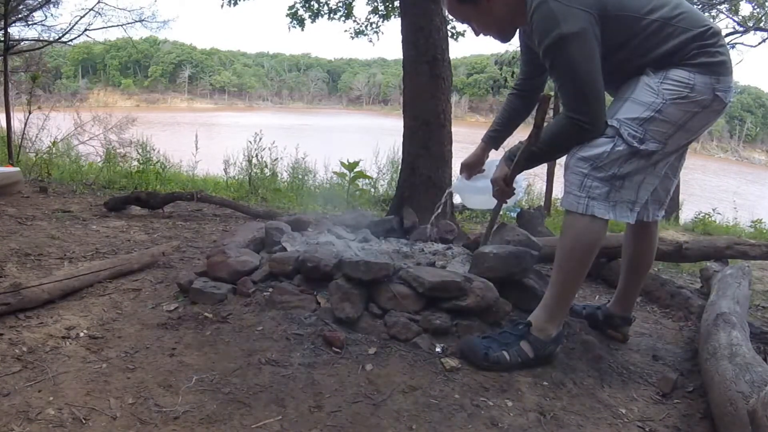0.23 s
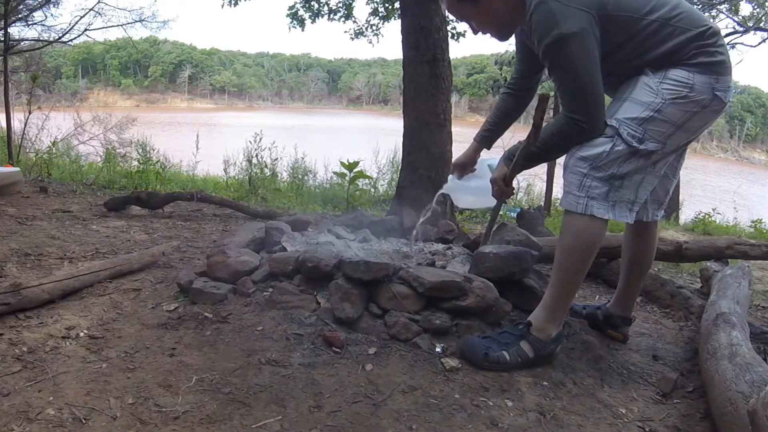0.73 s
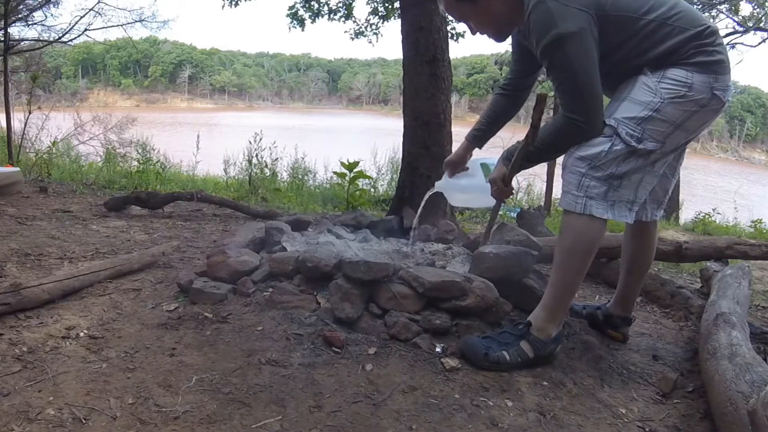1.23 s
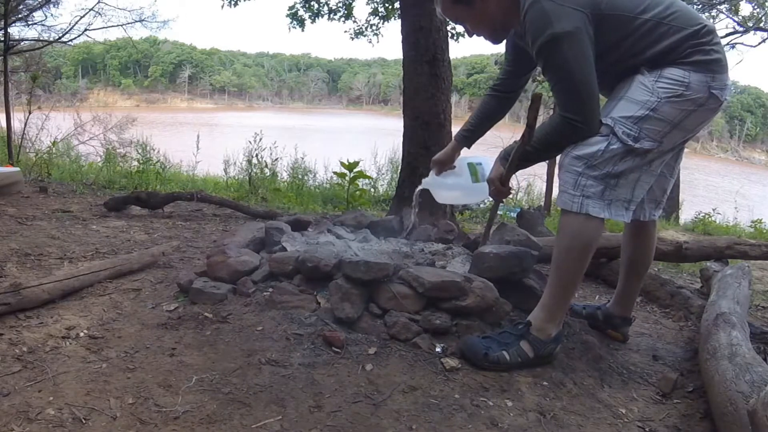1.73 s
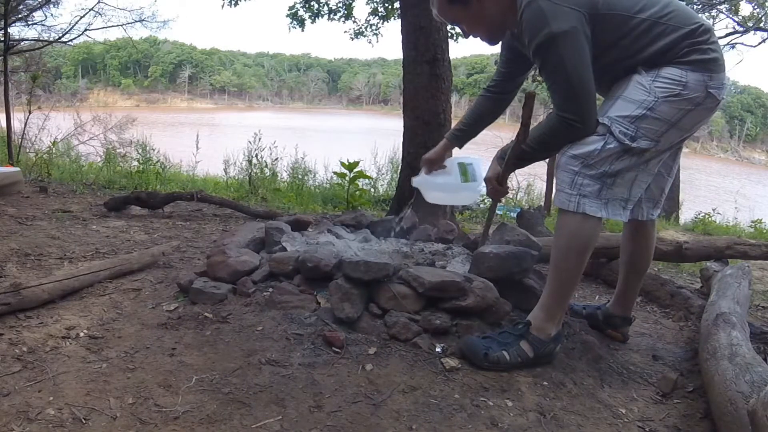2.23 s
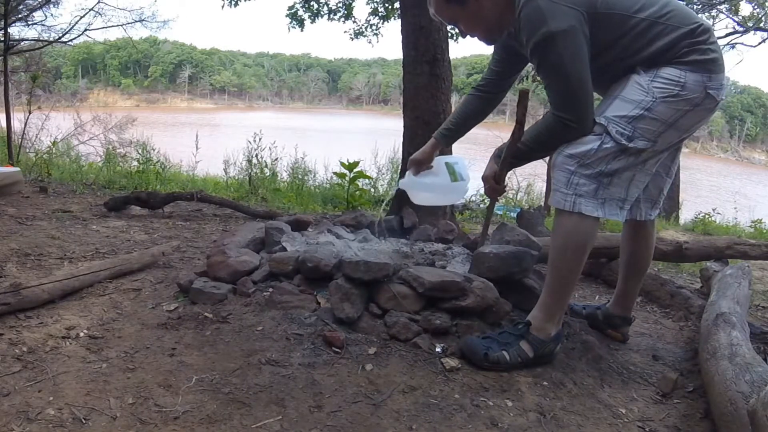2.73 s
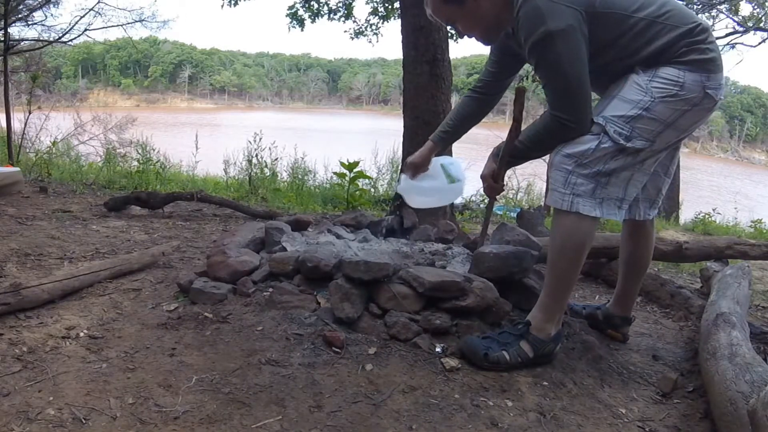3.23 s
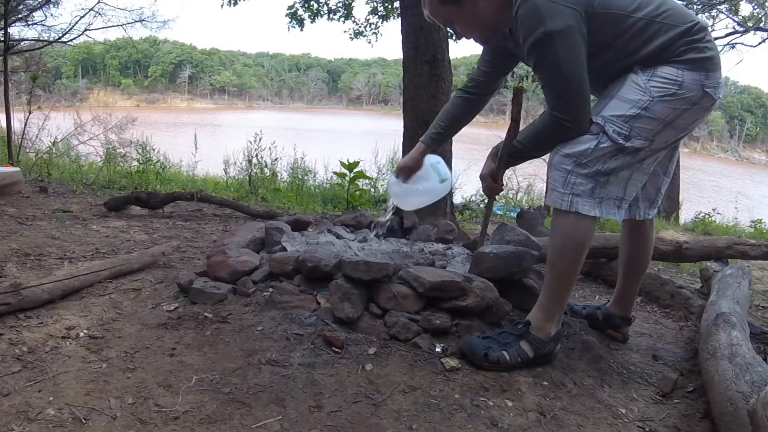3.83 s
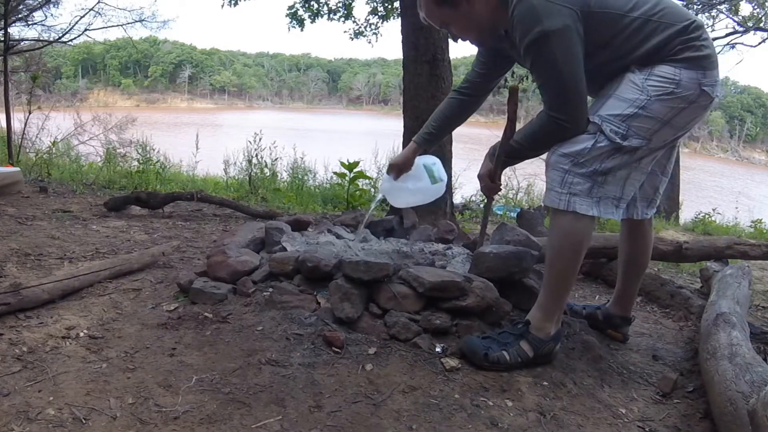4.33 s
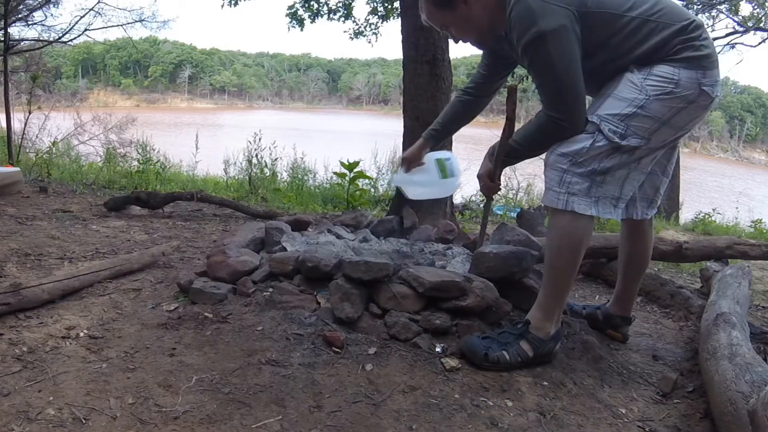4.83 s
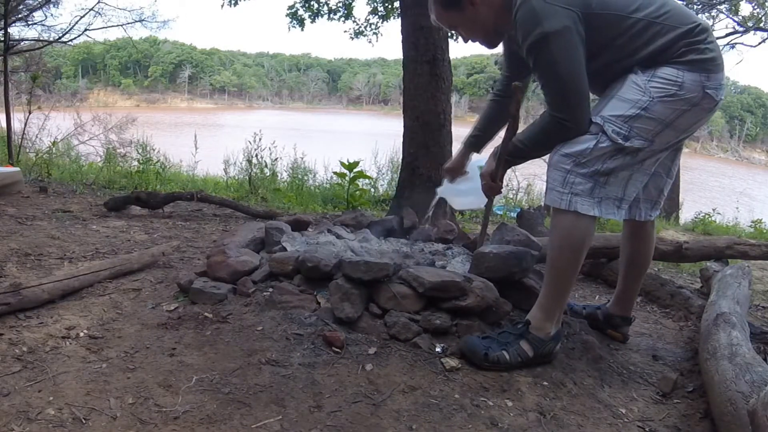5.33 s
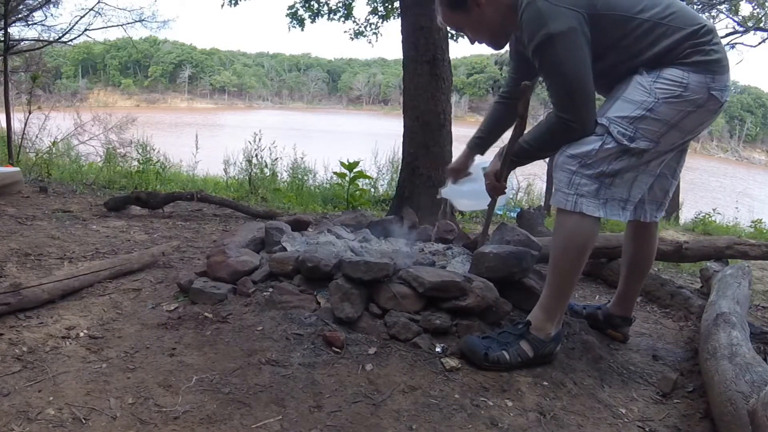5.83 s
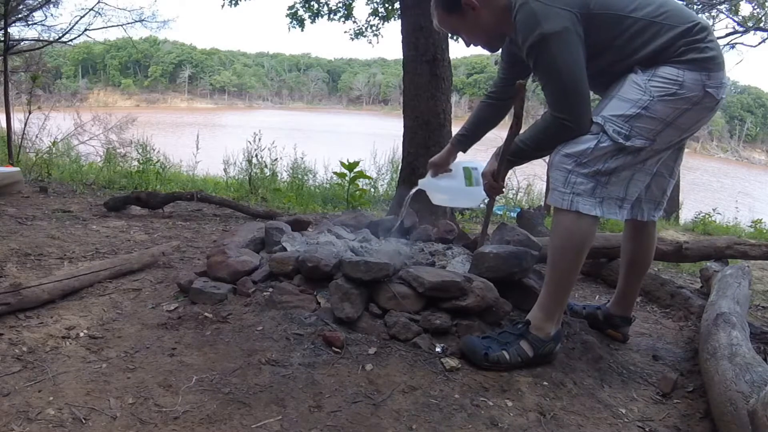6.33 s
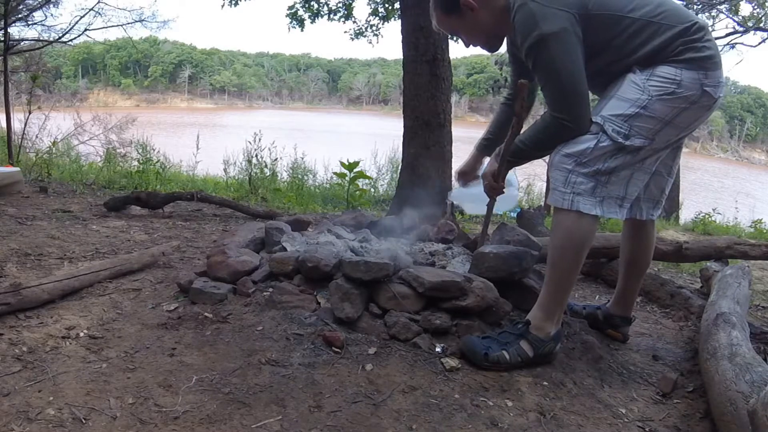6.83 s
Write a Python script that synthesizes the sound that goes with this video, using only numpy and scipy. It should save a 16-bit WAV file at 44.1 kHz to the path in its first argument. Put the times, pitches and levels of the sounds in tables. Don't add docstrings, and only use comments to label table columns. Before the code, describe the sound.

Water trickles from a jug onto hot campfire coals, ticking and sizzling under low wind buffeting, with a cricket trill and distant bird song.

```python
import sys
import numpy as np
from scipy import signal
from scipy.fft import rfft, irfft, next_fast_len
from scipy.io import wavfile
from scipy.ndimage import uniform_filter1d

SR = 44100
rng = np.random.default_rng(int(sys.argv[2]) if len(sys.argv) > 2 else 0)


def to_wav(sig):
    pcm = np.clip(np.atleast_2d(sig), -1, 1) * 32767
    pcm = np.round(pcm).astype(np.int16)
    wavfile.write(sys.argv[1], SR, pcm.T)


def elevation(decibels):
    levels = np.asarray(decibels, float)
    return 10 ** (levels / 20)


N = 312669

# start in seconds, length in seconds,
# sizzle level in dB, spray level in dB relative to the sizzle.
STEAM_FLASHES = [(1.804, 0.084, -67.5, -8), (1.97, .1, -69, -8), (2.07, .04, -67, -12),
                 (2.146, 0.056, -65.5, -12), (2.26, .04, -66, -13), (2.408, 0.045, -65.5, -14),
                 (2.967, 0.065, -72, 3), (3.2, .2, -75, -7), (4.4, .2, -71.5, -4), (4.62, .05, -69, -4),
                 (4.88, 0.11, -69, -5), (5.148, .1, -66, -5), (5.25, 0.3, -60.5, -4),
                 (5.62, 0.18, -65.5, -4), (5.9, .2, -68.5, -6), (6.178, 0.057, -60, -3),
                 (6.255, 0.056, -57, -3.5), (6.326, 0.11, -61.5, -6), (6.495, 0.088, -59.5, -3.5),
                 (6.64, 0.31, -65.5, -20), (1.82, 5.2, -74.5, -20), (.07, .03, -71, -15),
                 (6.4, .08, -69, 2.5)]


def read(points, hz):
    f, value = np.transpose(points)
    return np.interp(np.log(hz + 1), np.log(f + 1), value)


def columns(rows, t):
    s, *values = np.transpose(rows)
    return [np.interp(t, s, v) for v in values]


def evened(x):
    return x / np.sqrt(np.mean(x ** 2) + 1e-20)


def add(mix, s, sound):
    part = mix[round(s * SR):][:len(sound)]
    part += sound[:len(part)]


def colour(x, points):
    size = next_fast_len(len(x))
    gain = elevation(read(points, np.fft.rfftfreq(size, 1 / SR)))
    return evened(irfft(rfft(x, size) * gain, size)[:len(x)])


def wander(per_s):
    return colour(rng.standard_normal(N), [(0, 0), (per_s, 0), (2 * per_s, -40), (SR, -80)])


def grains(per_s, spread_db, smooth):
    sizes = elevation(spread_db * np.minimum(rng.exponential(1, N), 5)) * rng.choice([-1., 1.], N)
    clicks = evened(sizes * (rng.random(N) < per_s / SR))
    share = np.clip(smooth, 0, 1)
    return share * rng.standard_normal(N) + np.sqrt(1 - share ** 2) * clicks


def bursts(rows, t):
    rise_s, drain = 0.022, 3.7
    coarse = t[::32]
    power = np.zeros(len(coarse))
    for s, length, db in rows:
        decay_db = 60 * np.clip(coarse - s - length, 0, 2) / (drain * length)
        rise = np.clip((coarse - s) / rise_s + .5, 0, 1)
        power += (elevation(db - decay_db) * rise) ** 2
    return np.interp(t, coarse, np.sqrt(power))


def snaps(rows, t60, wide, gain_db):
    out, t = np.zeros(N), np.arange(600) / SR
    rise_s = .0006
    chance = rng.uniform(-1.14, 1, (len(rows), 3))
    for (s, db, hz), (low, high, quick) in zip(rows, chance):
        ring = np.sin(2 * np.pi * hz * t)
        ring += wide * np.sin(2 * np.pi * hz * (0.863 + 0.043 * low) * t)
        ring += wide * np.sin(2 * np.pi * hz * (1.143 + 0.053 * high) * t)
        decay = elevation(-60 * t * (1 + 0.38 * quick) / t60)
        rise = 1 - np.exp(-(t / rise_s) ** 2)
        add(out, s + 0.00025, elevation(db + gain_db) * ring * rise * decay)
    return out


def trees(x, t60, first_s):
    t = np.arange(SR // 2) / SR
    echoes = rng.standard_normal(len(t)) * (rng.random(len(t)) < .15)
    tail = echoes * elevation(-60 * t / t60) * np.clip(t / first_s - .5, 0, 1)
    return signal.fftconvolve(x, tail / np.linalg.norm(tail))[:N]


def wind(t):
    # frequency in Hz, level in dB per Hz.
    buffet_spectrum = [(12, -48), (20, 0), (38, 3.5), (75, -4.5), (124, -15), (176, -23.5), (204, -26.5),
                       (300, -38.5), (390, -53), (660, -120)]
    rumble_spectrum = [(50, -38), (75, 1.5), (100, 0.5), (125, -3), (145, -10.5), (175, -8.5), (200, -21),
                       (400, -26), (800, -56.5)]
    # time in seconds, level in dB.
    strength = [(0, -58.5), (.25, -55.5), (.9, -54), (1.45, -52), (1.8, -47.5), (2.05, -48.5), (2.4, -45),
                (2.9, -45.5), (3.2, -49), (3.8, -48.5), (4.15, -50.5), (4.7, -50.5), (5.3, -51.5),
                (5.75, -50), (6.1, -49), (6.5, -49.5), (6.8, -51.5), (7.09, -50)]
    # centre in seconds, width in seconds, level in dB.
    strikes = [(.06, 0.1, -47.5), (.48, .05, -49), (0.709, 0.039, -47), (1.2, 0.022, -44.5),
               (1.459, 0.024, -41), (1.531, 0.047, -38.5), (2.2, .06, -43), (6.33, .04, -43),
               (1.78, 0.069, -50), (2.05, 0.027, -37), (2.38, 0.11, -36.5), (2.72, 0.14, -42),
               (3.03, 0.019, -41.5), (3.26, 0.027, -45), (4.3, .05, -52), (4.385, 0.031, -35.5),
               (4.487, 0.023, -37), (4.7, 0.048, -43.5), (4.815, 0.03, -37.5), (5.03, 0.056, -43),
               (5.17, .04, -44.5), (5.45, 0.043, -45), (6.17, 0.11, -42), (6.47, 0.043, -41),
               (6.553, 0.016, -31)]
    calm_db, buffet_slope, buffet_db = -50, 1.16, -50.5
    push_hz, push_db, swirl_db = 44.3, 4.0, -1.3

    wind_db = columns(strength, t)[0]
    power = elevation(buffet_db + buffet_slope * (wind_db - calm_db)) ** 2
    push = np.zeros(N)
    for s, width, db in strikes:
        power += elevation(db + swirl_db) ** 2 * np.exp(-((t - s) / width) ** 2)
        pulse = np.sin(2 * np.pi * push_hz * (s - t)) * np.exp(-((t - s) * push_hz * 2) ** 2)
        push += elevation(db + push_db) * pulse
    lumps = wander(11.4)
    low = evened(colour(rng.standard_normal(N), buffet_spectrum) * elevation(1.9 * lumps))
    upper = evened(colour(rng.standard_normal(N), rumble_spectrum) * elevation(1.8 * lumps - 0.6))
    return np.sqrt(power) * low + push + elevation(wind_db - 1.0) * upper


def air(t):
    # frequency in Hz, level in dB per Hz.
    hiss_spectrum = [(60, -15), (200, -4), (400, -8.5), (650, -10), (1300, -13.5), (2300, -16.5),
                     (3500, -20.5), (4600, -21.5), (6000, -20.5), (8500, -25), (10300, -33.5), (12500, -40),
                     (13600, -37.5), (14500, -58)]
    rustle_spectrum = [(300, -9), (1000, -2), (3000, -33), (7000, 4), (11000, 1), (14300, -8), (16000, -40)]
    # time in seconds, level in dB.
    leaf_level = [(0, -74.5), (.5, -74), (1.1, -73), (1.45, -73), (1.7, -81.5), (4, -80), (7.09, -77.5)]
    hiss_db = -60
    hiss = elevation(hiss_db + 0.44 * wander(4.8)) * colour(grains(2500, 2.8, 0.847), hiss_spectrum)
    rustle = colour(rng.standard_normal(N), rustle_spectrum)
    return hiss + elevation(columns(leaf_level, t)[0]) * rustle


def cricket(t):
    # start in seconds, end in seconds, start level in dB, end level in dB.
    trill_bouts = [
        (0, 1.38, -75, -71.5),
        (1.36, 1.97, -75, -73),
        (1.95, 2.24, -70.5, -62),
        (2.547, 2.658, -73, -78),
        (2.545, 4.08, -67.5, -67),
        (4.003, 4.24, -74, -72),
        (4.89, 6.7, -68.5, -68.5),
    ]
    rise_s, fade_s = .012, 0.09
    tone = np.zeros(N)
    for hz in (4030, 4125):
        late_rise = np.interp(t, (5.3, 6.1), (0, 70))
        pitch = hz + late_rise + 10 * wander(4.92) + 68 * wander(100)
        tone += np.sin(2 * np.pi * np.cumsum(pitch) / SR)
    strokes = 1 + .6 * np.sin(2 * np.pi * np.cumsum(110 + 8 * wander(4.7)) / SR)
    level = np.zeros(N)
    for s, end, db0, db1 in trill_bouts:
        gate = np.clip(np.minimum((t - s) / rise_s, (end - t) / fade_s), 0, 1)
        level += elevation(np.interp(t, (s, end), (db0, db1)) - 3.0) * gate
    return level * evened(tone * strokes * elevation(0.71 * wander(60)))


def spray(t):
    # frequency in Hz, level in dB per Hz.
    mist_spectrum = [(1200, -23), (1600, -2), (2200, -1.5), (3000, -1.5), (3800, -2.5), (4400, -24),
                     (6000, -39)]
    # time in seconds, level in dB.
    wash = [(0, -72), (.8, -69.5), (1.55, -72.5), (1.7, -81), (3.3, -74), (4.0, -69.5), (5.2, -70.5),
            (6.2, -72.5), (6.62, -86)]
    thrown = bursts([(s, length, db + share_db) for s, length, db, share_db in STEAM_FLASHES], t)
    level = np.hypot(thrown, elevation(columns(wash, t)[0]))
    return level * elevation(1.65 * wander(30)) * colour(grains(1200, 2.5, 0.73), mist_spectrum)


def embers():
    # start in seconds, peak level in dB, ring frequency in Hz.
    ticks = [(.016, -46.5, 5600), (.1595, -50, 4750), (.392, -49, 5410), (.5157, -49, 4690),
             (.7098, -44, 5250), (.749, -43.5, 4550), (.7352, -48, 4970), (.9273, -48, 4530),
             (.9762, -50, 5200), (.9921, -48, 4600), (1.8332, -50, 5200), (1.8538, -46, 4270),
             (1.9919, -51, 5450), (2.081, -45.5, 5200), (2.1535, -52, 4500), (2.175, -47, 5300),
             (2.1899, -44, 4300), (2.2657, -44, 4400), (2.4385, -46, 5100), (2.4448, -41.5, 5800),
             (2.7334, -47, 5500), (2.827, -51, 5560), (2.8862, -43, 5150), (3.0155, -45, 5600),
             (3.0253, -35, 4760), (3.2236, -39.5, 4500), (3.4587, -48, 5300), (3.8656, -53, 5730),
             (3.899, -40.5, 5060), (3.9669, -47, 4460),
             (4.373, -47, 4300), (4.4368, -44, 5360), (4.9846, -44, 5500), (5.027, -50, 5100),
             (5.241, -47, 5300), (5.4914, -41, 4580), (5.6022, -42, 5060), (5.6383, -44, 5520),
             (5.9376, -46, 4760), (5.9993, -51, 4600), (6.1828, -48, 4870), (6.1938, -44, 5480),
             (6.2786, -42, 5000), (6.3904, -47, 4770), (6.51, -40, 4930), (6.6019, -47, 5170),
             (6.8264, -47, 5930), (6.8728, -46.5, 5500),
             (.774, -53, 4350), (.82, -53, 5200), (.948, -55, 4900), (.7495, -45, 6000),
                (1.3379, -56, 5290), (1.8048, -56, 4500), (1.8093, -56, 4700), (1.863, -52, 5400),
                (1.8931, -52, 5680), (1.9125, -53, 5460), (1.942, -57, 5650), (2.0123, -52, 5400),
                (2.088, -52, 5500), (2.109, -51, 4600), (2.1974, -42.5, 4800), (2.2203, -51, 5690),
                (2.229, -50, 5600), (2.2712, -45, 4460), (2.2785, -50, 4400), (2.2862, -45, 5650),
                (2.293, -50, 4500), (2.3171, -54, 5510), (2.4109, -51, 5330), (2.4822, -54, 5960),
                (2.7057, -52, 5300), (2.8454, -50, 5130), (3.089, -53, 5700), (3.246, -50, 5000),
                (3.2799, -57, 5330), (3.4341, -55, 4800), (3.777, -54, 4650), (4.4224, -51, 6010),
                (4.9182, -50, 5050), (5.2626, -45, 5300), (5.281, -51, 5200), (5.3509, -46, 5570),
                (5.4072, -47, 5770), (5.4422, -50, 5770), (5.503, -46, 4500), (5.5345, -48, 4500),
                (6.292, -47, 5200), (6.305, -44, 5000), (6.41, -44, 5100), (6.4716, -54, 4610),
                (6.5486, -43, 5300), (6.6257, -49, 5000), (6.6756, -55, 4800), (6.745, -53, 4850),
                (6.817, -50, 5800), (6.8507, -54, 4500), (6.895, -50, 5300), (6.913, -50, 4600),
                (6.952, -51, 4300)]
    return snaps(ticks, 0.0065, 0.49, 4.2)


def bubbles(per_s, low_hz, high_hz, cycles, count=14):
    out = np.zeros(N)
    for hz in np.geomspace(low_hz, high_hz, count) * rng.uniform(1.0, 1.05, count):
        u = np.arange(0, 1, hz / (SR * cycles))
        note = np.sin(2 * np.pi * cycles * (u + 0.13 * u ** 2)) * u * np.exp(-5 * u)
        ringing = signal.oaconvolve(grains(per_s / count, 2.0, 0), note)[:N]
        out += ringing * np.sqrt(hz / low_hz) ** 0.3
    return evened(out)


def pour(t):
    # frequency in Hz, level in dB per Hz.
    sizzle_spectrum = [(2500, -39), (3400, -16), (4300, -9.5), (4800, -7), (5600, -7.5), (6100, -11.5),
                       (6500, -21), (8000, -25.5), (12000, -46)]
    splash_spectrum = [(150, -17), (300, 7), (450, 1.5), (800, -6), (1500, -5), (2200, -10.5), (2800, -14),
                       (4200, -36), (6000, -50)]
    # start in seconds, length in seconds, level in dB.
    slaps = [(.45, 0.062, -63), (1.0, 0.33, -66), (1.45, 0.1, -64.5), (1.85, .04, -67), (2.98, .04, -63),
             (3.22, 0.34, -67), (4.3, 0.34, -68.5), (4.85, 0.23, -71), (5.14, 0.16, -65),
             (5.32, 0.042, -57), (5.42, 0.062, -55), (5.52, 0.084, -62.5), (5.985, 0.035, -62),
             (6.18, 0.1, -59), (6.26, 0.067, -54), (6.35, 0.08, -58), (6.68, 0.044, -59.5),
             (6.82, 0.11, -63.5), (6.925, 0.043, -55.5), (7.06, .03, -66)]
    slap_db = 0.9
    clumps = wander(39)
    sizzle = evened(colour(grains(2200, 3.9, 0.83), sizzle_spectrum) * elevation(1.5 * clumps))
    slap = colour(grains(500, 2.3, 0.73), splash_spectrum) + 0.37 * bubbles(1200, 297.0, 2510, 7.5)
    splash = evened(slap * elevation(1.2 * clumps + 0.9 * wander(9.1)))
    steam = bursts([row[:3] for row in STEAM_FLASHES], t) * sizzle
    return steam + elevation(slap_db) * bursts(slaps, t) * splash


def songbird(t):
    motif_a = {"a": (0, .028, 3460, 3490, -72), "b": (.036, .032, 2560, 2550, -70),
               "c": (.106, .04, 2500, 2480, -71), "d": (.135, .05, 2930, 3000, -73),
               "e": (.182, .042, 2350, 2050, -66), "f": (.188, .008, 3440, 3050, -63),
               "g": (.24, .02, 2650, 2720, -66), "h": (.271, .036, 2690, 2820, -64),
               "i": (.328, .07, 2345, 2320, -69), "j": (.316, .022, 3060, 3200, -72),
               "k": (.4, .065, 2790, 2720, -73), "l": (.16, .04, 2460, 2430, -70),
               "m": (.308, .032, 2700, 2790, -66), "n": (.272, .062, 2760, 2700, -66),
               "o": (.352, .015, 2900, 2850, -68), "p": (.115, .016, 2170, 2120, -69),
               "q": (.205, .035, 3130, 3050, -75), "r": (.312, .056, 2350, 2320, -67),
               "s": (.185, .04, 3700, 3670, -77), "t": (.04, .03, 3470, 3400, -74),
               "u": (.362, .012, 3420, 3500, -69), "v": (.34, .03, 2300, 2300, -73),
               "w": (.32, .045, 2850, 2750, -72)}
    motif_b = {"a": (-.004, .068, 1940, 2215, -66), "b": (.07, .02, 2480, 2480, -63),
               "c": (.087, .022, 2200, 1650, -64.5), "d": (.116, .022, 2320, 2250, -67),
               "e": (.12, .028, 2130, 1870, -68), "f": (.17, .013, 3150, 2450, -63),
               "g": (.197, .02, 2650, 2710, -62), "h": (.233, .027, 2680, 2860, -60),
               "i": (.277, .042, 2320, 2315, -66), "j": (.115, .035, 2460, 2500, -68),
               "l": (.445, .027, 2400, 2280, -64), "m": (.469, .017, 2090, 1980, -69),
               "n": (.045, .04, 2800, 3000, -73), "o": (.171, .009, 3300, 2900, -63),
               "p": (.265, .04, 2780, 2720, -68), "q": (.178, .016, 3150, 2700, -64),
               "r": (.283, .075, 2340, 2310, -65), "s": (.092, .045, 2300, 2200, -70),
               "t": (.095, .05, 2050, 1880, -69), "u": (.375, .045, 2700, 3020, -72),
               "v": (.205, .04, 2950, 3230, -70), "w": (.385, .055, 2450, 2350, -73),
               "x": (.48, .03, 2150, 2300, -72), "y": (.236, .038, 2680, 2930, -61)}
    # start in seconds, syllables sung.
    rounds_a = [
        (.099, "abdsehjv"),
        (.452, "atbcdeghijwu"),
        (.808, "bcfghmo"),
        (1.172, "cplqnrk"),
    ]
    rounds_b = [
        (3.664, "anbcdfghi"),
        (4.022, "anbdjoghip"),
        (4.378, "abstjqgvyruwlmx"),
    ]
    # time in seconds, level
    # in dB.
    facing = [(.1, 0.6), (.3, 1.5), (.39, -4), (.46, 2.5), (.5, 1), (.58, 0), (.65, 1.5), (.72, 0),
              (.79, 2), (.82, -1), (.93, 1), (1.0, -1), (1.06, 2), (1.1, 3.5), (1.16, -6), (1.3, 1),
              (1.46, -1.5), (1.6, -6),
              (3.7, -2), (3.745, -4), (3.77, 0), (3.84, 0), (3.87, 5), (3.91, 2.5), (3.96, -10),
                (4.05, 3), (4.1, 1), (4.15, 2), (4.23, -1), (4.27, -2.5), (4.32, 2), (4.39, -7),
                (4.46, 1.5), (4.59, -1.5), (4.63, 3), (4.7, -3)]
    out, quaver_hz = np.zeros(N), 22 * wander(90)
    for motif, rounds in ((motif_a, rounds_a), (motif_b, rounds_b)):
        for start, sung in rounds:
            for late, length, hz0, hz1, db in map(motif.get, sung):
                s = start + late
                u = np.arange(0, 1, 1 / (SR * (length + 0.006)))
                glide = u ** (1.4 if hz1 < hz0 else .85)
                pitch = hz0 + (hz1 - hz0) * glide + quaver_hz[int(s * SR):][:len(u)]
                whistle = np.sin(2 * np.pi * np.cumsum(pitch) / SR)
                add(out, s - .003, elevation(db + 5.6) * whistle * signal.windows.tukey(len(u), .5))
    return out * elevation(columns(facing, t)[0] + 1.9 * wander(110))


def plops():
    # start in seconds, peak level in dB, ring frequency in Hz.
    knocks = [(0.1595, -49, 3300), (0.79, -53, 3550), (0.7484, -51, 2900), (1.8745, -48, 1340),
              (2.1529, -45.5, 2850), (2.4388, -45, 4000), (2.2944, -48, 2180), (2.4383, -43, 3000),
              (3.3, -45, 1500), (3.0894, -48, 3350), (4.538, -40, 2900), (5.2618, -43, 2480),
              (2.1855, -41, 3720), (5.9448, -36, 3370), (6.1803, -46, 1600), (5.602, -46.5, 3300),
              (6.2402, -47, 2180), (5.3, -44.5, 1580), (6.277, -41, 710), (6.544, -44, 3100),
              (6.575, -43, 3000), (4.897, -50, 1420), (2.1, -53, 2500), (2.109, -53, 2550),
              (2.745, -54, 3650), (3.36, -52, 2500), (3.0232, -49, 2500), (2.4388, -43, 2390),
              (6.55, -48, 1780), (4.542, -44, 1100), (6.548, -45, 1430), (2.279, -45, 2200)]
    return snaps(knocks, 0.0095, 0.33, 4.0)


def hollows():
    # start in seconds, length in seconds, frequency in Hz, bandwidth in Hz, level in dB.
    pockets = [
        (5.669, 0.061, 212, 70, -60.5),
        (6.185, 0.1, 1540, 200, -62),
        (6.234, 0.078, 2200, 300, -61),
        (6.26, 0.059, 446, 90, -56.5),
        (6.37, 0.077, 232, 80, -55.5),
        (6.75, 0.24, 200, 70, -58),
    ]
    out = np.zeros(N)
    for s, length, hz, width, db in pockets:
        band = [(hz / 4, -80), (hz - 2 * width, -30), (hz - width / 2, -3), (hz, 0),
                (hz + width / 2, -3), (hz + 2 * width, -30), (4 * hz, -80)]
        noise = colour(rng.standard_normal(SR // 5), band)[:int(length * SR)]
        add(out, s, elevation(db) * noise * signal.windows.tukey(len(noise), .4))
    return out


def housing(near):
    # frequency in Hz, gain in dB.
    response = [(500, 0.5), (3500, 2), (3950, -1), (4400, 2), (5900, 4), (6500, -12), (9000, -20),
                (14000, -30)]
    return np.sqrt(np.mean(near ** 2)) * colour(near, response)


def scene():
    t = np.arange(N) / SR
    trill = cricket(t)
    song = songbird(t)
    far = trill + elevation(-4.5) * trees(trill, 0.1, 0.0023)
    far += song + elevation(-5.5 + 2.3 * wander(45)) * trees(song, 0.5, 0.017)
    near = embers() + plops()
    near = housing(near + elevation(-9.0) * trees(near, 0.039, 0.0023))
    return (wind(t) + air(t) + pour(t) + spray(t) + hollows() + far + near)[None]


def top_cut(x):
    return signal.sosfilt(signal.butter(12, 14340, fs=SR, output="sos"), x)


def record(dry):
    # frequency in Hz, threshold in dB relative to the usual level.
    threshold = [(6000, -22), (8000, -10), (9500, -4), (11000, 0), (12500, 2.5), (13600, 4), (14200, 6),
                 (14500, 7)]
    hz, _, z = signal.stft(dry, SR, "cosine", nperseg=2048)
    chance = rng.standard_normal((z.shape[2], 65))
    uneven_db = 1.2 * np.repeat(chance, 16, axis=1).T[:len(hz)]
    usual = uniform_filter1d(uniform_filter1d(abs(z), size=48, axis=1), size=9, axis=2)
    limit = usual * elevation(read(threshold, hz)[:, None] + uneven_db)
    kept = signal.istft(z * (abs(z) > limit), SR, "cosine", nperseg=2048)[1][:, :N]
    return top_cut(kept)


dry = scene()
out = record(dry)
to_wav(out)
```